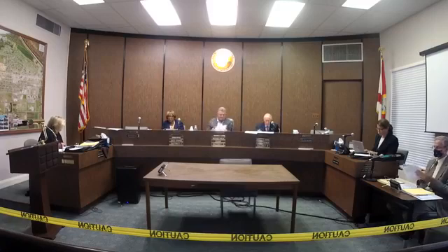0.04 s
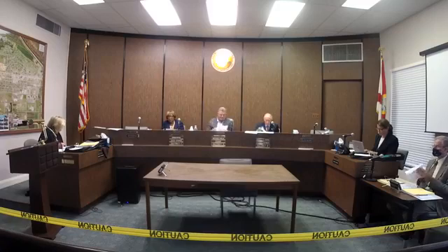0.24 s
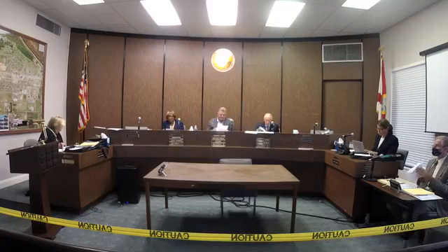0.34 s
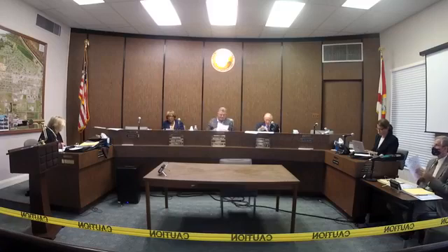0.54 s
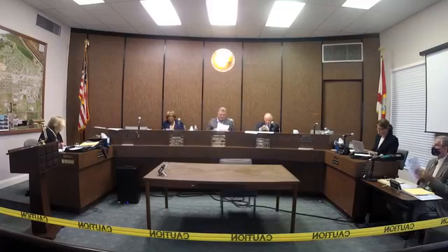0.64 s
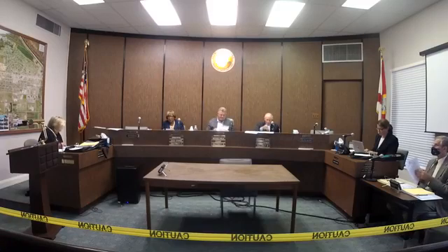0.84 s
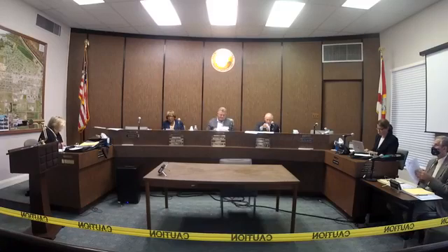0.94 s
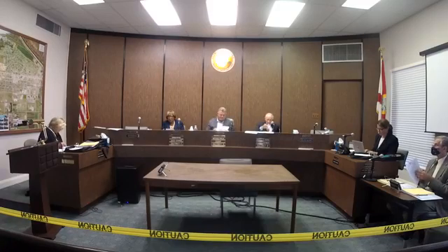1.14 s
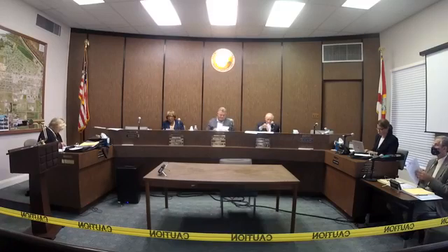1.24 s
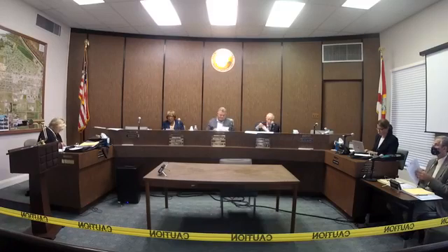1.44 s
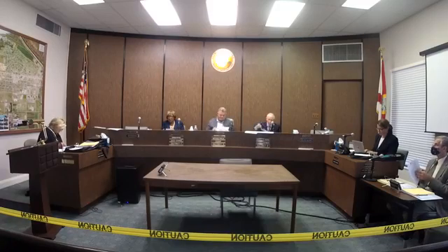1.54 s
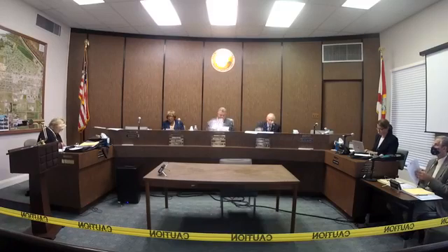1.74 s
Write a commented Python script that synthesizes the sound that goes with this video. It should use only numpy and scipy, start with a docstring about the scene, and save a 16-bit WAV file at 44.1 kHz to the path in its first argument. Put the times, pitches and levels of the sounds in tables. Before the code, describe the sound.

Papers being turned and gathered, with light desk knocks and two hard clicks, in a quiet room

```python
"""Sheets of paper turn, slide, gather and lift at desks in a quiet meeting room.
Filtered random clicks and rubbing noise make the crinkling and hiss; short bursts make creases pop.
Something small and hard, perhaps a pen or a paper clip, snaps twice close by: a brief crack rings it.
Things knock lightly on the desks: short clatter over a dull thud, both made from noise bursts.
Reflections follow these sounds; behind them are steady ventilation noise and a faint hum, a sine wave."""
import sys
import numpy as np
from scipy import signal
from scipy.fft import rfft, irfft
from scipy.io import wavfile

SR = 44100
rng = np.random.default_rng(int(sys.argv[2]) if len(sys.argv) > 2 else 0)


def file_out(sig):
    """Save sig as 16-bit WAV at sys.argv[1]."""
    # one column per channel
    cols = np.atleast_2d(sig).T
    # limit, then scale
    lim = np.clip(cols, -1, 1)
    pcm = np.round(lim * 32767).astype(np.int16)
    wavfile.write(sys.argv[1], SR, pcm)


N = 79380  # length in samples
TIME = np.arange(N) / SR  # s
BINS = np.maximum(np.arange(N + 1) * SR / (2 * N), 1)  # frequencies of the filter curves, Hz

# Paper movements, before each movement's gain: t/s, crinkle level/dB, sliding hiss level/dB
TURN = [(0.9, -56, -56), (0.914, -61, -51), (0.932, -53, -44.5), (0.956, -43.5, -52), (0.974, -37.5, -37.5),
        (1.01, -26, -46), (1.03, -24.5, -34), (1.078, -31.5, -73), (1.098, -54, -64)]
SLIDE = [(1.098, -41, -47), (1.106, -32, -35.5), (1.126, -27.5, -68), (1.152, -31, -46),
         (1.172, -44.5, -44), (1.29, -52, -60.5), (1.31, -66, -71)]
GATHER = [(1.32, -86, -58), (1.362, -49, -48), (1.38, -52.5, -60), (1.456, -31, -36.5), (1.464, -49, -47),
          (1.47, -27.5, -35.5), (1.492, -25.5, -42), (1.498, -28.5, -51), (1.542, -27.5, -48),
          (1.578, -53, -45.5), (1.62, -48, -58)]
LIFT = [(1.62, -48, -58), (1.634, -48, -55), (1.642, -39.5, -52), (1.658, -37.5, -56), (1.666, -34.5, -55),
        (1.678, -56, -70), (1.708, -53, -57), (1.758, -36, -51.5), (1.8, -41, -68)]
# Tone of the crinkling in each movement: f/Hz, level/dB
TURN_COLOUR = [(40, -27), (90, -5.5), (200, -0.5), (450, -9), (750, -5), (1050, -6.5), (1400, 3),
               (2000, -1.5), (3200, -4.5), (4500, -12), (7000, -23.5), (14000, -40.5)]
SLIDE_COLOUR = [(40, -29), (150, -11), (450, -15.5), (750, -12), (1050, -4.5), (1500, -5.5), (2200, -1),
                (3200, -4), (4500, -14), (7000, -27.5), (14000, -48)]
GATHER_COLOUR = [(40, -44), (160, -12), (450, -11), (750, 2.5), (1000, 8), (1600, 6.5), (2400, -2),
                 (4500, -14.5), (7000, -27), (14000, -36)]
LIFT_COLOUR = [(40, -44), (180, -3), (450, 1), (850, 8.5), (1300, 8), (2000, 7), (3000, -1.5), (4500, -7),
               (7000, -21), (14000, -26)]
# Tone of the sliding hiss: f/Hz, level/dB
HISS_COLOUR = [(500, -11), (3000, 5.5), (4800, 2.5), (6800, -5.5), (9200, -2), (10800, -13), (13000, -18),
               (16000, -33)]
# Sharp creases popping in the sheets: t/s, level/dB, centre f/Hz
CREASES = [(0.138, -44.5, 3630), (0.897, -45, 7100), (1.017, -27, 1880), (1.027, -19.5, 1820),
           (1.031, -25.5, 2270), (1.038, -28, 2360), (1.052, -25, 2400), (1.103, -39, 4870),
           (1.123, -34.5, 2550), (1.137, -35, 2770), (1.147, -28.5, 1920), (1.475, -28.5, 2360),
           (1.489, -35, 4000), (1.520, -36.5, 4050), (1.608, -42, 1680), (1.642, -38.5, 3920),
           (1.654, -36.5, 2060), (1.665, -43.5, 7640), (1.755, -34, 2230), (1.759, -40.5, 1750),
           (1.766, -36, 2260)]
# Tone shared by all creases: f/Hz, level/dB
CREASE_COLOUR = [(100, 5.5), (600, 9.5), (1700, 9), (4500, -0.5), (9000, -7.5), (16000, -18)]

# The two snaps: t/s, level/dB, level sent to the room relative to the snap/dB
SNAPS = [(0.2342, -16, -12), (0.3235, -12.5, -11)]
# Ringing of the snapping thing: f/Hz, level/dB, time to fade by 60 dB/s
SNAP_MODES = [(790, -10, 0.02), (1090, -5.5, 0.0076), (1760, -3, 0.0065), (1910, 0.5, 0.0088),
              (2530, -0.5, 0.03), (3860, -7.5, .009), (4080, -4, 0.0081), (4540, 3.5, 0.0078),
              (5090, -3.5, 0.0056), (6170, -6, 0.018), (7560, -11, 0.0046), (8200, -13, 0.0066),
              (9200, -20.5, 0.007)]
# Echoes off desk and walls: delay t/s, level relative to the sound sent to the room/dB
SNAP_ECHOES = [(.0052, -9.5), (0.016, -8.5), (.0340, -8.5)]
# Tone of the duller first and the brighter second snap: f/Hz, level/dB
DULL_SNAP = [(100, -46), (400, -16.5), (700, 3.5), (1250, -3), (1850, 1), (2800, -7), (3700, 0.5),
             (4700, -0.5), (6200, -4.5), (7200, -18), (8200, -15.5), (10000, -38), (16000, -39)]
BRIGHT_SNAP = [(40, -24), (120, -3.5), (300, -3), (550, -3), (1000, 4.5), (1850, 0), (2800, 1), (4000, 2.5),
               (5000, -3), (6200, 3), (7800, -0.5), (9700, -3.5), (11500, -17), (16000, -38)]

# Light knocks: t/s, clatter level/dB, fall time/s, ring f/Hz, treble limit f/Hz,
# thud level relative to the clatter/dB
KNOCKS = [(0.096, -35.5, 0.0066, 750, 6000, -18), (0.149, -37, 0.0048, 1590, 3000, -16),
          (0.157, -36, 0.0067, 1100, 2200, -22), (0.381, -32, 0.022, 1700, 6000, -14),
          (0.422, -37, 0.018, 1920, 2580, -16), (0.463, -42.5, 0.013, 480, 2700, -4),
          (0.525, -32.5, 0.0094, 1620, 4050, -22), (0.554, -37, 0.016, 1800, 2420, -9),
          (0.613, -71, 0.0059, 2400, 4000, -13), (0.720, -47, 0.011, 382, 1530, 5),
          (0.731, -42.5, .008, 1460, 5350, -38), (0.799, -45.5, .006, 1710, 2430, -14),
          (0.93, -32, 0.02, 1280, 4570, -17), (1.008, -30.5, 0.013, 740, 1700, -4.5),
          (1.261, -52.5, 0.011, 606, 1200, 7), (1.414, -36, 0.0068, 850, 2940, -17),
          (1.452, -31.5, 0.0069, 1210, 2030, -29), (1.470, -30, .006, 990, 2430, -13.5),
          (1.650, -39.5, 0.014, 1150, 2200, -0.5), (1.723, -41.5, 0.0087, 1380, 3800, -11)]
# Tone shared by the clatter of all knocks: f/Hz, level/dB
KNOCK_COLOUR = [(100, -29), (350, -3), (650, -1), (1100, 0), (1600, -0.5), (2600, -2), (4000, -3.5),
                (8000, -10.5), (16000, -16)]

# How long the room rings: f/Hz, time to fade by 60 dB/s
ROOM_T60 = [(100, 1), (500, 0.5), (2000, 0.23), (5000, 0.49), (9000, 0.49), (16000, 0.23)]
# Tone of the room: f/Hz, level/dB
ROOM_COLOUR = [(100, -3.5), (500, 5), (1400, 3.5), (3000, 1), (4500, 1.5), (6500, -2), (9000, 5),
               (16000, 6.5)]
# Tone of the ventilation: f/Hz, level/dB
VENT = [(25, 1), (50, -10), (80, -13), (120, 4.5), (180, 3), (300, -8.5), (600, -9.5), (1200, -10.5),
        (3000, -12.5), (6000, -16), (10000, -19), (16000, -23.5)]

TURN_DB, SLIDE_DB, GATHER_DB, LIFT_DB, HISS_DB = -2, -3.5, -4, -1.5, -1  # gains
BUCKLES_PER_S = 900  # average number of clicks in each half octave
BUCKLE_SPREAD_DB = 3  # average boost of a click above the smallest, before the cap
RUB_SHARE = 0.8  # strength of the rubbing relative to the clicks
FLUTTER_PER_S, FLUTTER_DB = 170, 5.775  # random level points; largest swing up or down
CREASE_FALL_S, CREASE_Q = 0.0021, 2.2  # Q: a higher value gives a narrower, clearer pitch
SNAP_CRACK_DB, CRACK_HOLD_S, CRACK_FALL_S = -10, 0.0021, 0.0011
KNOCK_RING, KNOCK_Q = 1.48, 4.6  # gain of the ring relative to the plain clatter; its sharpness
THUD_HZ, THUD_WIDTH_HZ, THUD_FALL_S = 201.4, 126, 0.0065  # width of one resonance; the thud uses two
ROOM_BUILD_S, PAPER_ROOM_DB, KNOCK_ROOM_DB = 0.004, -10.5, -4.5
VENT_DB, HUM_HZ, HUM_DB = -53, 122.6, -71.5
MIC_LOW_HZ, TOP_HZ = 71, 16000


def papers():
    """Moving sheets crinkle as they buckle and hiss as they slide; now and then a crease pops."""
    out, grain, hiss_gain = 0, crinkle(), 0
    for move, tone, gain_db in [(TURN, TURN_COLOUR, TURN_DB), (SLIDE, SLIDE_COLOUR, SLIDE_DB),
                                (GATHER, GATHER_COLOUR, GATHER_DB), (LIFT, LIFT_COLOUR, LIFT_DB)]:
        t, crinkle_db, hiss_db = np.array(move).T
        moving = (TIME >= t[0]) & (TIME < t[-1])
        crinkle_gain = moving * amp(np.interp(TIME, t, crinkle_db) + gain_db)
        out = out + colour(grain * crinkle_gain, tone)
        hiss_gain = hiss_gain + moving * amp(np.interp(TIME, t, hiss_db) + HISS_DB)
    out = out + colour(crinkle() * hiss_gain, HISS_COLOUR)
    out = out + creases()
    return out + amp(PAPER_ROOM_DB) * room(out)


def crinkle():
    """Patches of paper buckle in flurries of clicks, each patch at its own pitch, over smooth rubbing."""
    spectrum = 0
    for hz in 62.5 * 2 ** np.arange(0, 8.5, .5):
        boost_db = BUCKLE_SPREAD_DB * np.minimum(rng.exponential(size=N), 4)
        happens = rng.random(N) < BUCKLES_PER_S / SR
        clicks = happens * amp(boost_db) * np.sign(rng.standard_normal(N))
        flutter = np.interp(TIME * FLUTTER_PER_S, np.arange(N), rng.uniform(-1, 1, N))
        rubbing = RUB_SHARE * rng.standard_normal(N)
        patch = (unit(clicks) + rubbing) * amp(FLUTTER_DB * flutter)
        # Neighbouring bands cross over smoothly, half an octave apart.
        nearness = np.maximum(1 - 2 * abs(np.log2(BINS / hz)), 0)
        spectrum = spectrum + rfft(patch, 2 * N) * np.sin(np.pi / 2 * nearness)
    return unit(irfft(spectrum)[:N])


def creases():
    """A sharp crease pops: a tiny burst is shaped by one broad resonance."""
    out = 0
    for t, db, hz in CREASES:
        tone = amp(along(CREASE_COLOUR, BINS)) * resonance(hz, hz / CREASE_Q)
        pop = shape(burst(CREASE_FALL_S), tone)
        out = out + late(blow(pop, db), t)
    return out


def snaps():
    """Two close snaps: a brief crack rings a small hard thing, then come echoes and the room."""
    power = amp(SNAP_CRACK_DB) ** 2  # the part of the crack that does not ring
    for hz, db, t60 in SNAP_MODES:
        width_hz = np.log(1000) / (np.pi * t60)  # a longer ring has a narrower peak
        power = power + (amp(db) * resonance(hz, width_hz)) ** 2
    body = np.sqrt(power)
    direct, send = 0, 0
    for (t, db, room_db), tone in zip(SNAPS, (DULL_SNAP, BRIGHT_SNAP)):
        ringing = shape(burst(CRACK_FALL_S, CRACK_HOLD_S), body)
        snap = late(blow(colour(ringing, tone), db), t)
        direct = direct + snap
        send = send + amp(room_db) * snap
    echoes = sum(amp(db) * late(send, delay) for delay, db in SNAP_ECHOES)
    return direct + echoes + room(send)


def knocks():
    """Light knocks: a short, faintly ringing clatter over the dull thud of the desk top."""
    out = 0
    desk = resonance(THUD_HZ, THUD_WIDTH_HZ) ** 2
    for t, db, fall_s, ring_hz, high_hz, thud_db in KNOCKS:
        ring = np.hypot(1, KNOCK_RING * resonance(ring_hz, ring_hz / KNOCK_Q))
        tone = amp(along(KNOCK_COLOUR, BINS)) * ring * below(high_hz, order=4)
        clatter = blow(shape(burst(fall_s), tone), db)
        thud = blow(shape(burst(THUD_FALL_S), desk), db + thud_db)
        out = out + late(clatter + thud, t)
    return out + amp(KNOCK_ROOM_DB) * room(out)


def room(x):
    """Many blurred reflections build up and fade, at a different speed in each octave."""
    noise, tail = rfft(rng.standard_normal(N), 2 * N), 0
    for hz in 62.5 * 2 ** np.arange(9):
        band = irfft(noise * np.maximum(1 - abs(np.log2(BINS / hz)), 0))[:N]
        tail = tail + band * np.exp(-np.log(1000) * TIME / along(ROOM_T60, hz))
    build = 1 - np.exp(-TIME / ROOM_BUILD_S)
    tail = colour(tail * build, ROOM_COLOUR)
    return signal.fftconvolve(x, unit(tail) / np.sqrt(N))[:N]


def ventilation():
    """Steady air noise is filtered random noise."""
    return amp(VENT_DB) * unit(colour(rng.standard_normal(N), VENT))


def hum():
    """A faint steady hum is a single sine wave."""
    return amp(HUM_DB) * unit(np.sin(2 * np.pi * HUM_HZ * TIME))


def burst(fall_s, hold_s=0):
    """A dense run of tiny contacts, even in spectrum, that holds and dies away."""
    fade = np.exp(-np.maximum(TIME - hold_s, 0) / fall_s)
    contacts = rfft(rng.standard_normal(N) * fade)
    even = irfft(contacts / abs(contacts), N)
    return even * np.minimum(4 * fade, 1)  # evening out smears the burst, so trim its end


def resonance(hz, width_hz):
    """Gain curve of one resonance: strongest at its own pitch, weaker on either side."""
    return 1 / np.sqrt(1 + ((BINS ** 2 - hz ** 2) / (BINS * width_hz)) ** 2)


def amp(db):
    """Turn decibels into a gain."""
    return 10 ** (np.asarray(db) / 20)


def unit(x):
    """Scale to an rms (average strength) of 1."""
    return x / np.sqrt(np.mean(x ** 2))


def blow(x, db):
    """Scale a short sound to a level, as if all its energy lay within 5 ms."""
    return x * amp(db) / np.sqrt(np.sum(x ** 2) / (.005 * SR))


def along(points, hz):
    """Read between table points, with frequency on a log scale."""
    f, v = np.array(points, float).T
    return np.interp(np.log(hz), np.log(f), v)


def shape(x, gain):
    """Filter with the given gain at each frequency, with no sound ahead of its cause."""
    cepstrum = irfft(np.log(gain + 1e-6))
    cepstrum[1:N] *= 2  # fold it onto positive times: minimum phase
    cepstrum[N + 1:] = 0
    return irfft(rfft(x, 2 * N) * np.exp(rfft(cepstrum)))[:N]


def colour(x, points):
    """Filter by f/Hz, level/dB points, keeping the power of white noise."""
    return shape(x, unit(amp(along(points, BINS))))


def below(hz, order=2):
    """Gain curve that lets the lower frequencies through."""
    return 1 / np.sqrt(1 + (BINS / hz) ** (2 * order))


def above(hz, order=2):
    """Gain curve that lets the higher frequencies through."""
    return 1 / np.sqrt(1 + (hz / BINS) ** (2 * order))


def late(x, s):
    """Delay by s seconds."""
    return np.concatenate([np.zeros(max(int(s * SR), 0)), x])[:N]


def scene():
    """All the sounds add up at one microphone."""
    return (papers() + snaps() + knocks() + ventilation() + hum())[None]


def record(dry):
    """The microphone thins the deep bass and clips at full scale; the recorder cuts the top."""
    heard = np.clip(shape(dry[0], above(MIC_LOW_HZ)), -1, 1)[None]
    return signal.sosfilt(signal.ellip(10, .2, 70, TOP_HZ, fs=SR, output="sos"), heard)


dry = scene()
out = record(dry)
file_out(out)
```